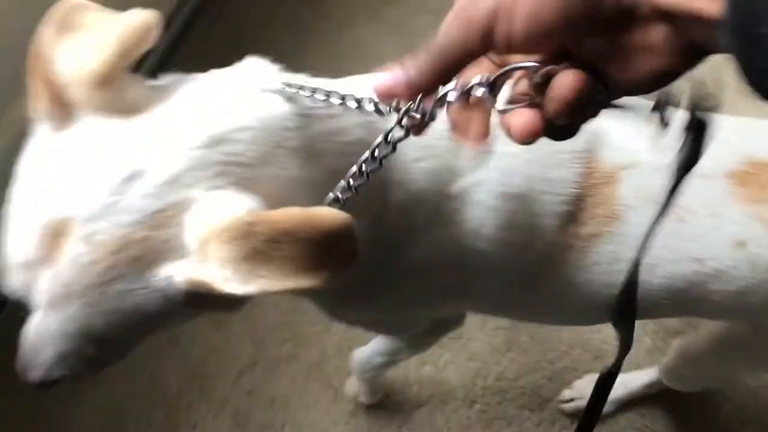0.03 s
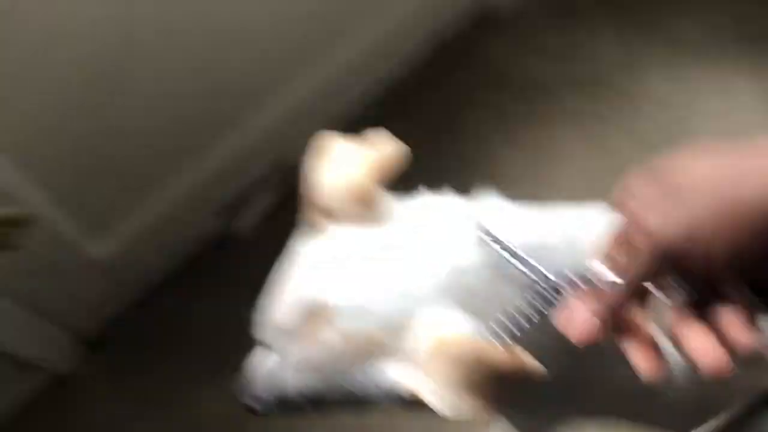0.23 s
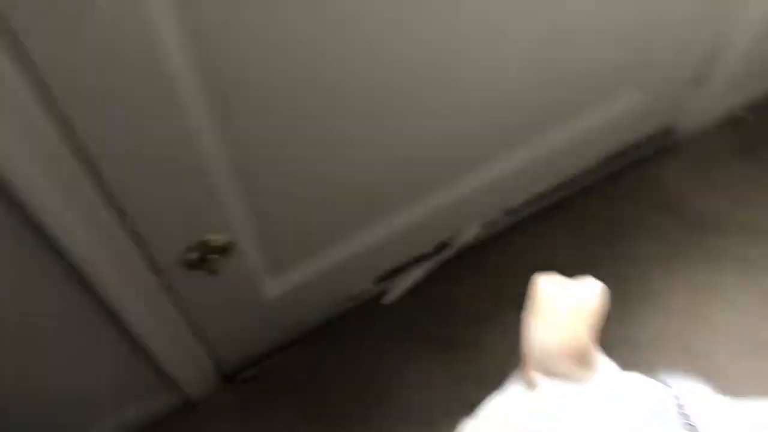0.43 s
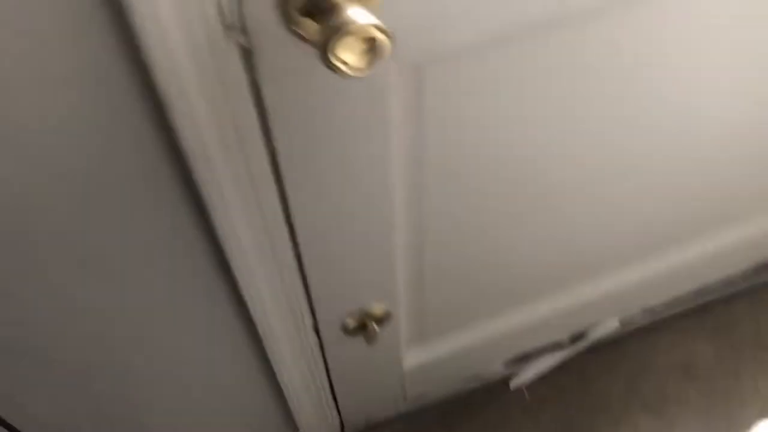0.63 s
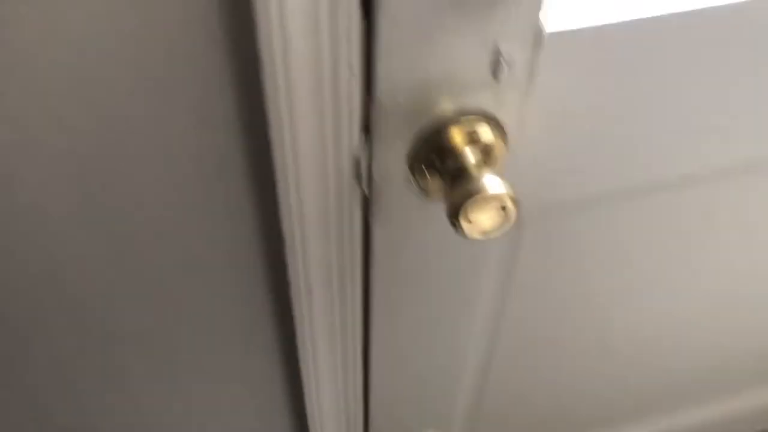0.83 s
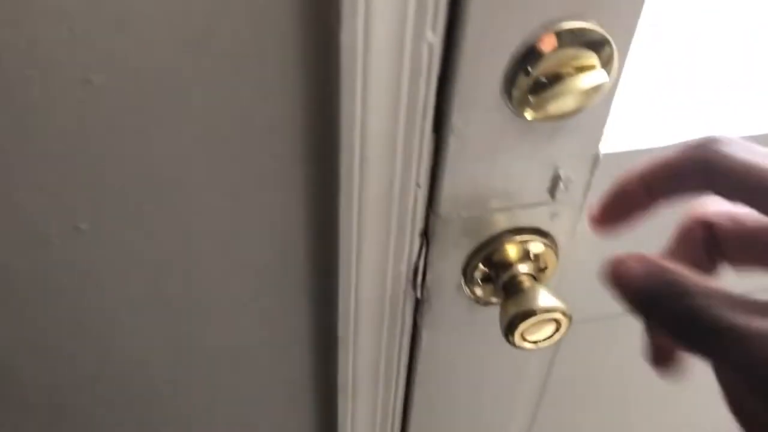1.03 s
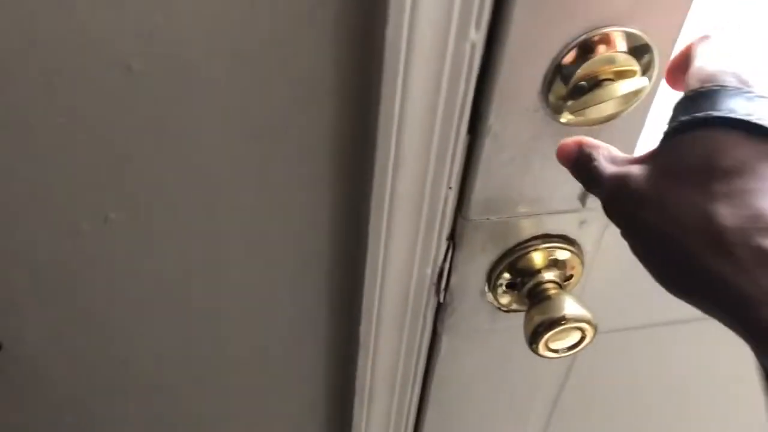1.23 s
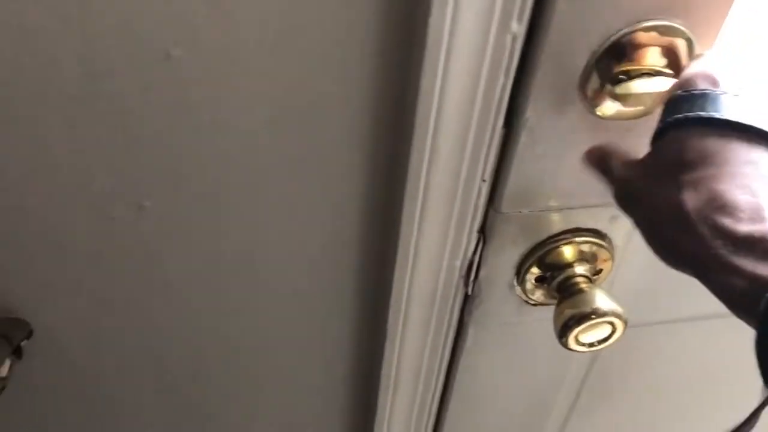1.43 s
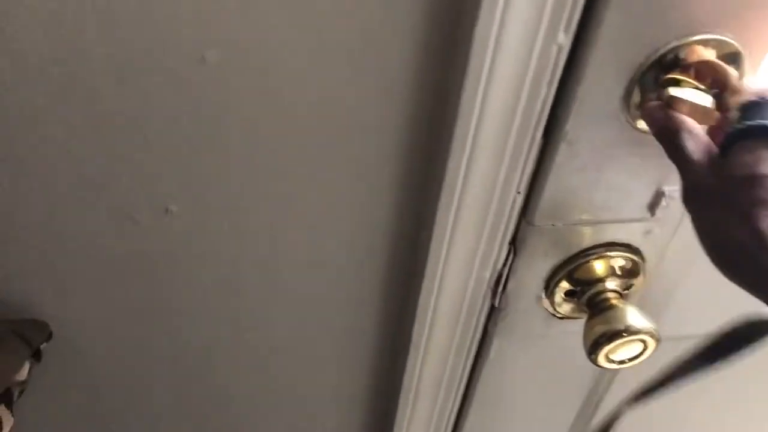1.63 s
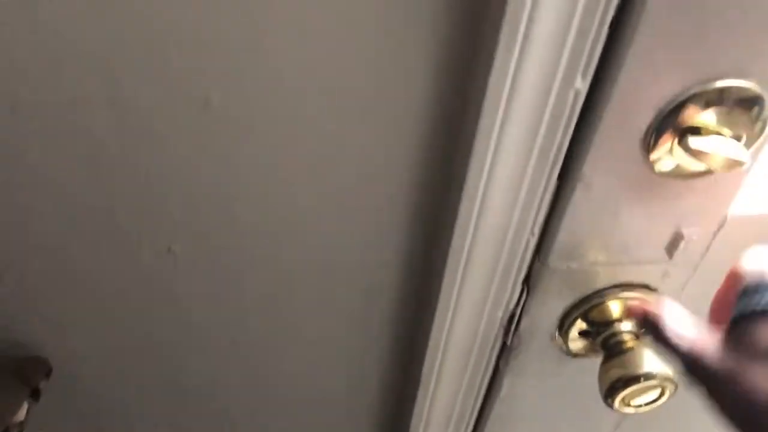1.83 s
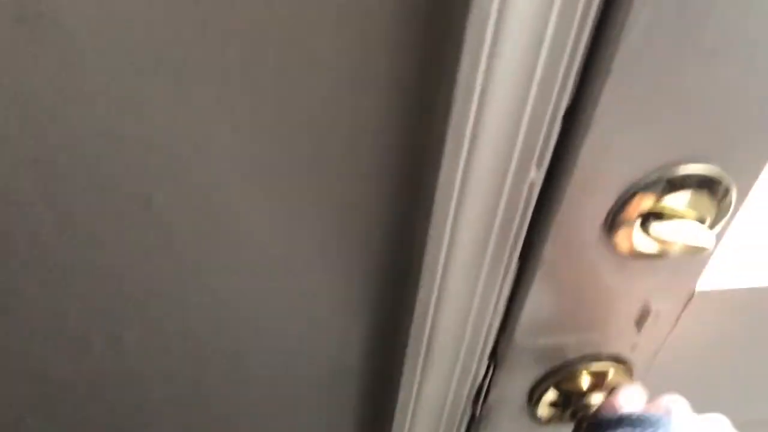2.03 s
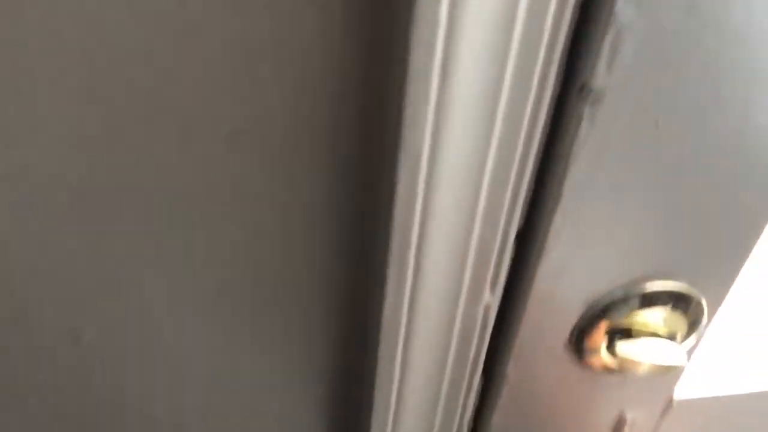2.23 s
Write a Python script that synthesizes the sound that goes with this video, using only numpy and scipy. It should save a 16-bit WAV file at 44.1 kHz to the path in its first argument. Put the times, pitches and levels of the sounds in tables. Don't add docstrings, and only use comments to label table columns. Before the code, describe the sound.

A dog's chain collar clinks in dry, quickly damped clicks from 0 to 0.55 s, with sharp clasp snaps at 0.38 and 0.59. From 0.7 to 0.95 links jingle with a thin, very high ring amid fur and sleeve rustle. After a lull, a door bolt clacks at 1.41 and harder at 1.58, with dull knocks and a clink at 1.51. Faint ticks follow over low ventilation rumble and soft hiss.

```python
import sys
import numpy as np
from scipy import signal
from scipy.fft import rfft, irfft
from scipy.io import wavfile
from scipy.ndimage import uniform_filter1d

SR = 44100
rng = np.random.default_rng(int(sys.argv[2]) if len(sys.argv) > 2 else 0)


def log_audio(samples):
    frames = np.atleast_2d(samples).T
    limited = np.clip(frames, -1, 1)
    pcm = np.round(limited * 32767).astype(np.int16)
    wavfile.write(sys.argv[1], SR, pcm)


def boost(x):
    u = np.asarray(x, float) / 20
    return 10 ** u


N = 100680
LEAD_S = 0.004


def evened(x):
    return x / np.sqrt(np.mean(x ** 2) + 1e-20)


def read(points, hz):
    f, value = np.transpose(points)
    return np.interp(np.log(hz + 1), np.log(f + 1), value)


def over_time(points):
    return np.interp(np.arange(N) / SR, *np.transpose(points))


def coloured(x, db_of):
    gain = boost(db_of(np.fft.rfftfreq(N, 1 / SR)))
    return evened(irfft(rfft(x) * gain, N))


def add(mix, s, sound):
    part = mix[round(s * SR):][:len(sound)]
    part += sound[:len(part)]


def strike(groups, rattle_s, slide_db, tick_db, db, low_db, high_db):
    longest_t60_s = 0.015
    detune, scatter_db = 0.006, 1.5
    t = np.arange(1400) / SR
    after = t - LEAD_S
    fade_s = rattle_s * boost(0.33 * (db + 20))
    shape = np.where(after < 0, boost(slide_db) * (t / LEAD_S) ** 2, np.exp(-after / fade_s))
    push = rng.standard_normal(len(t)) * shape
    push[round(LEAD_S * SR)] = boost(tick_db)

    out = 0
    for modes, group_db in zip(groups, (low_db, 0, high_db)):
        hz, mode_db, t60 = np.transpose(modes)[..., None]
        level_chance, pitch_chance = rng.standard_normal((2, len(modes), 1))
        tone = np.sin(2 * np.pi * hz * (1 + detune * pitch_chance) * t)
        decay = boost(-60 * t / np.minimum(t60, longest_t60_s))
        rung = signal.fftconvolve(push[None], decay * tone, axes=1)[:, :len(t)]
        rung *= (-1) ** np.arange(len(modes))[:, None]
        rung /= np.linalg.norm(rung, axis=1, keepdims=True)
        group = (boost(mode_db + scatter_db * level_chance) * rung).sum(0)
        out = out + boost(group_db) * group / abs(group).max()
    return boost(db) * out


def strikes(hits, groups, rattle_s, slide_db, tick_db):
    out = np.zeros(N)
    for s, *row in hits:
        add(out, s - LEAD_S, strike(groups, rattle_s, slide_db, tick_db, *row))
    return out


def without_bass(x):
    return signal.sosfilt(signal.butter(4, 1500, "high", fs=SR, output="sos"), x)


def air():
    # (f/Hz, level/dB)
    rumble_colour = [(12, -76.5), (20, -42), (62, -6), (80, 0.5), (145, -2), (177, -7), (275, -10.5),
                     (319, -15.5), (400, -62.5), (520, -92), (880, -120)]
    # (f/Hz, level/dB)
    hiss_colour = [(190, -18.5), (330, -8), (421, -8), (555, -16), (846, -14.5), (1520, -16), (2680, -27),
                   (3310, -26), (16000, -44.5)]
    # (f/Hz, width/Hz, lift/dB)
    duct_tones = [(73.1, 40, 5), (138.7, 37, 3), (274.7, 28.7, 7), (440, 13.3, 4.5)]
    # (t/s, level/dB)
    draught = [(0, -3), (.35, -1.5), (.6, -1), (1.3, 0.5), (1.7, 1), (2.28, 1)]
    rumble_db, hiss_db = -40, -52.5

    def lift(hz):
        return sum(peak / (1 + (2 * (hz - f) / wide) ** 2) for f, wide, peak in duct_tones)

    rumble = coloured(rng.standard_normal(N), lambda hz: read(rumble_colour, hz) + lift(hz))
    hiss = coloured(rng.standard_normal(N), lambda hz: read(hiss_colour, hz) + lift(hz))
    return boost(rumble_db + over_time(draught)) * rumble + boost(hiss_db) * hiss


def rustle():
    # (f/Hz, level/dB)
    rub_colour = [(290, -74), (500, 3.5), (893, -19.5), (1140, 6), (1300, -6.5), (2690, -0.5), (7980, -6.5),
                  (16000, -12.5)]
    # (t/s, level/dB)
    movement = [(0, -55), (.2, -57), (.3, -68), (.42, -56), (.52, -68), (.58, -55.5), (0.649, -45),
                (.85, -52.5), (0.951, -48), (1.04, -59.5), (1.2, -65.5), (1.3, -57.5), (1.38, -71.5),
                (1.62, -54), (1.72, -94), (2.0, -66), (2.17, -60), (2.28, -58)]
    grains_per_s, grain_db, grain_share = 4000, 4.5, 0.48
    grain_size = boost(grain_db * np.minimum(rng.exponential(1, N), 3))
    grains = grain_size * (rng.random(N) < grains_per_s / SR)
    noise = rng.standard_normal((2, N))
    rub = grain_share * evened(grains * noise[0]) + (1 - grain_share) * noise[1]
    return coloured(rub, lambda hz: read(rub_colour, hz)) * boost(over_time(movement))


def knocks():
    # (t/s, peak level/dB, low modes/dB, high modes/dB)
    thuds = [(.599, -42.5, 8.5, 1), (.636, -41, 0, 0), (0.654, -40, 0, -1), (0.701, -51, 6.5, -9),
             (.775, -44, -17, -7), (0.919, -45, 1, -3), (1.4568, -25, 1, 3), (1.4690, -37.5, 4, -6.5),
             (1.5144, -33, 3.5, 5), (1.548, -46, -10, 7), (1.6170, -28.5, -14, -8),
             (1.627, -30.5, -5.5, -3), (2.115, -46, -5, 4)]
    # (f/Hz, level/dB, time to fall 60 dB/s)
    panel_modes = [
        [(342, 3, 0.012), (445, -1.5, 0.004)],
        [(580, -2, 0.015), (796, 0, 0.019)],
        [(1050, -0.37, 0.0044), (1330, -1.5, 0.0065)],
    ]
    return strikes(thuds, panel_modes, rattle_s=0.0026, slide_db=-19, tick_db=12)


def bolt():
    # (t/s, peak level/dB, low modes/dB, high modes/dB)
    clacks = [(1.4088, -14.5, -10.5, -11.5), (1.4245, -35, 0.5, -2), (1.4572, -25.5, 0, -9),
              (1.4690, -42, -4, -12), (1.5125, -34.5, 2.5, -15), (1.545, -44.5, -9, -9.5),
              (1.5760, -43, -6, 0), (1.5840, -11, -22.5, -2.5), (1.5975, -37, 6, -12),
              (1.6060, -30, -0.5, -1), (1.6150, -22, -3, 9.5), (1.6223, -23.5, -6.5, 5.5)]
    # (f/Hz, level/dB, time to fall 60 dB/s)
    lock_modes = [
        [(684, -1.2, 0.008), (1370, 0.23, 0.021)],
        [(1680, -3, .01), (1890, 3, 0.012), (2470, -8, .008), (2940, 4, 0.013), (3410, -8, .008),
         (3760, 3, 0.010)],
        [(4760, 8, 0.0044), (5300, 9.5, 0.0068), (6000, 5.5, 0.0028), (7050, 4, 0.0035), (9100, 2, 0.0019),
         (11640, 1, 0.0015), (15860, 3, 0.005)],
    ]
    return boost(-0.5) * strikes(clacks, lock_modes, rattle_s=0.0025, slide_db=-19, tick_db=19)


def ring():
    # (t/s, peak level/dB, upper tone/dB, time until damped/s)
    touches = [(0.2242, -38, 17.5, 0.0056), (0.4467, -36.5, 10, 0.008), (0.6977, -36, 5, 0.015),
               (.715, -24, 10, 0.021), (0.747, -38, -19, 0.011), (0.7583, -32.5, 13, 0.011),
               (.772, -32, 6, 0.0056), (0.777, -27, 5, 0.023), (0.7872, -21, 4, 0.021),
               (.7915, -36, -23, 0.014), (0.813, -32.5, -20, 0.011), (.841, -32.5, 10.5, 0.0024),
               (.877, -43, 10, 0.014), (0.8955, -26, -12, 0.0025), (0.9137, -24.5, 5.5, 0.0031),
               (0.919, -35, 13, 0.018), (1.489, -47, 18, 0.014), (1.5135, -16.5, -11.5, 0.0023),
               (1.518, -54, -10, 0.0084), (1.798, -43.5, 4, 0.0026)]
    # (f/Hz, time to fall 60 dB/s)
    ring_tones = [(10300, .16), (10705, .022)]
    rise_s, stop_s = 0.001, 0.003
    left_db = -37
    out, t = np.zeros(N), np.arange(8000) / SR
    (low_hz, low_t60), (up_hz, up_t60) = ring_tones
    for s, db, upper_db, held in touches:
        angle = 2 * np.pi * (t + round(s * SR) / SR)
        lower = boost(-60 * t / low_t60) * np.sin(low_hz * angle)
        upper = boost(upper_db - 60 * t / up_t60) * np.sin(up_hz * angle)
        rise = 1 - np.exp(-t / rise_s)
        damping = boost(left_db) + np.exp(-np.maximum(t - held, 0) / stop_s)
        add(out, s, boost(db) * (lower + upper) * rise * damping)
    return out


def clasp():
    # (t/s, peak level/dB, low modes/dB, high modes/dB)
    first_snap = [
        (0.3818, -10.5, -23.5, 6),
        (0.3940, -29, -19.5, 7),
        (.4005, -39.5, -9, 4.5),
    ]
    # (f/Hz, level/dB, time to fall 60 dB/s)
    clasp_modes = [
        [(3470, 0, 0.0064)],
        [(4350, -10, 0.0089), (5130, -10, 0.006), (7540, -0.5, 0.018), (8200, -4.5, .006), (8750, -7.5, .005),
         (9190, -6.5, 0.005), (11160, -8.5, 0.005)],
        [(11860, -14.5, .006), (13570, -4, 0.006), (15040, -2, 0.0041), (15540, -0.5, 0.0053),
         (15900, -0.5, .002)],
    ]
    # (t/s, peak level/dB, low modes/dB, high modes/dB)
    shut_snap = [
        (0.5861, -8, -10, 3.5),
        (0.5988, -26, -18, 1),
        (0.6025, -34, -6, 14),
    ]
    # (f/Hz, level/dB, time to fall 60 dB/s)
    shut_modes = [
        [(2100, 0.36, 0.0033), (2600, -0.77, .004), (3680, -1, 0.0097)],
        [(4750, 0.5, 0.0048), (5230, -5.5, .004), (5710, -7, 0.0075), (7620, -3.5, 0.016), (9370, -9, 0.0058),
         (10400, -4, 0.0095)],
        [(12800, 3, .008), (13100, -3, 0.0072), (13800, -10, .007), (14450, 5.5, .006), (14700, 4.5, 0.004)],
    ]
    settings = dict(rattle_s=0.0017, slide_db=-36, tick_db=19)
    snaps = strikes(first_snap, clasp_modes, **settings) + strikes(shut_snap, shut_modes, **settings)
    return without_bass(snaps)


def chain():
    # (t/s, peak level/dB, low modes/dB, high
    # modes/dB)
    link_hits = [(0.04, -37, -18, 5), (0.064, -44, 1, 7), (0.0757, -40.5, -20.5, 17.5),
                 (0.1324, -16.5, -31.5, -30), (0.1356, -29, 2.5, -32), (0.148, -44, -10, -10),
                 (0.1509, -19.5, -13.5, 0.5), (0.218, -39, -2, 12), (0.2242, -17.5, -11, 3),
                 (0.2258, -26, -13, -11), (.2300, -17.5, -15.5, 3), (0.265, -33.5, -12, 6),
                 (0.2944, -29, -30, 3.5), (0.358, -47.5, -18.5, 12), (.368, -43, -9, -6),
                 (.442, -47, -1, -10), (0.4508, -33, -2, 10), (0.4606, -24, -8.5, 9), (0.512, -36, -7, -6),
                 (0.529, -42, 1, -20), (.5390, -40, -13.5, -23), (0.547, -51, 16, 8),
                 (.6345, -35.5, 10, -10),
                 (0.699, -28, -19, 1), (0.7149, -25.5, 1, 2), (0.7356, -26.5, -3, 2), (0.75, -35, -3, 6),
                (0.7574, -26, -1, 4), (.772, -37, -3, 2), (0.7745, -30.5, -3, 1), (0.787, -35, -2, 6),
                (0.796, -48, 2, -8), (.818, -40, 0, -10), (0.842, -31.5, -2, 3), (0.876, -26, -3, 2),
                (0.8961, -25, 2.5, 8.5), (.9140, -22.5, 1.5, 1), (0.921, -24, 0, 1), (0.922, -28, -7, 15),
                (0.925, -40, -2, 0), (.9424, -49, -13, 2), (1.4890, -39, -5, 3), (1.515, -22.5, -10, 0),
                (1.7774, -50, -6, -0.5), (1.7986, -40, -8, 1), (1.828, -56, -17, 9), (2.09, -58, 0, -8),
                (2.162, -48, 9.5, -13)]
    # (f/Hz, level/dB, time to fall 60 dB/s)
    link_modes = [
        [(2020, -4.5, 0.0016), (3160, -1.5, 0.0022), (4190, -6.5, 0.0023)],
        [(4370, 0.5, 0.0028), (6630, 7, 0.00069), (7600, 0.5, 0.011), (8440, -2.5, 0.0021),
         (10750, -13.5, 0.0055)],
        [(11300, -9, 0.0015), (12370, -12.5, 0.0057), (15150, -8, 0.0035)],
    ]
    clicks = strikes(link_hits, link_modes, rattle_s=0.0025, slide_db=-28, tick_db=12)
    return without_bass(boost(-1.5) * clicks)


def hall(x):
    # (f/Hz, time to fall 60 dB/s)
    echo_times = [(300, 0.77), (2000, 0.34), (6000, .25), (15000, 0.13)]
    echo_db = -15.5
    taps = np.zeros(SR // 2)
    at = np.arange(200, len(taps) - 12, 12)
    taps[at + rng.integers(0, 12, len(at))] = rng.choice([-1., 1.], len(at))
    hz, t, bands = signal.stft(taps, SR, nperseg=256)
    fading = bands * boost(-60 * t / read(echo_times, hz)[:, None])
    tail = signal.istft(fading, SR, nperseg=256)[1]
    return signal.fftconvolve(x, boost(echo_db) * tail / np.linalg.norm(tail))[:N]


def scene():
    flutter, flutter_s = 0.88, 0.0005
    links, lock, sung = chain() + clasp(), bolt() + knocks(), ring()
    shaded = signal.lfilter(*signal.butter(1, 3500, fs=SR), lock)
    wobble = evened(uniform_filter1d(rng.standard_normal(N), round(flutter_s * SR)))
    uneven = np.sqrt(1 - flutter ** 2) + flutter * wobble
    walls = hall(uneven * (links + shaded) + boost(-9) * sung)
    steady = signal.oaconvolve(walls + air() + rustle(), signal.firwin(601, 15800, fs=SR), "same")
    return (links + lock + sung + steady)[None]


def top_cut(x):
    return signal.sosfilt(signal.butter(12, 17050, fs=SR, output="sos"), x)


def record(dry):
    # (f/Hz, level/dB)
    treble_limit = [(0, 0), (15550, 0), (15900, -14), (16400, -17), (17000, -50), (SR / 2, -90)]
    hz, db = np.transpose(treble_limit)
    limited = signal.oaconvolve(dry, signal.firwin2(401, hz, boost(db), fs=SR)[None], "same")
    return top_cut(limited)


dry = scene()
out = record(dry)
log_audio(out)
```